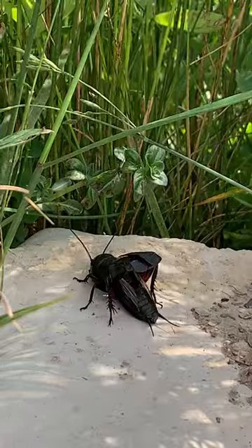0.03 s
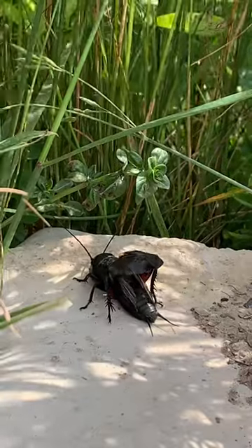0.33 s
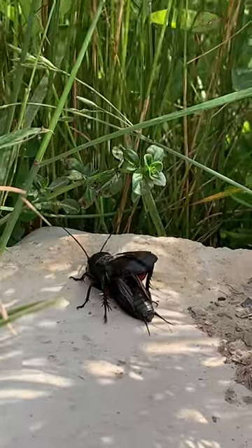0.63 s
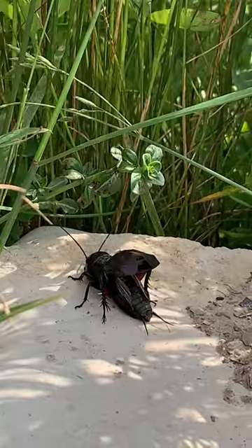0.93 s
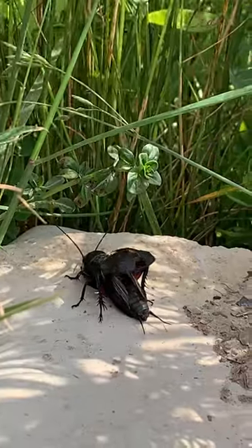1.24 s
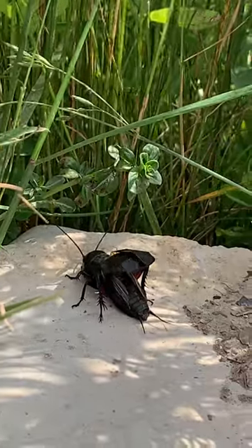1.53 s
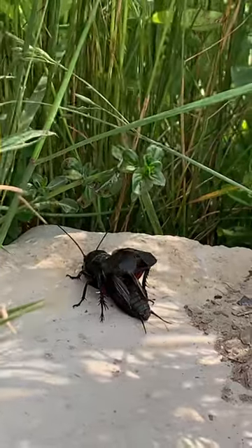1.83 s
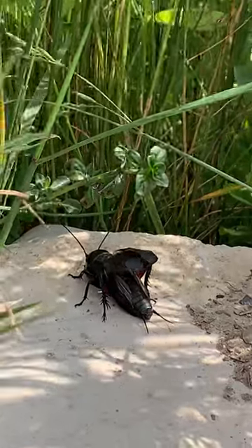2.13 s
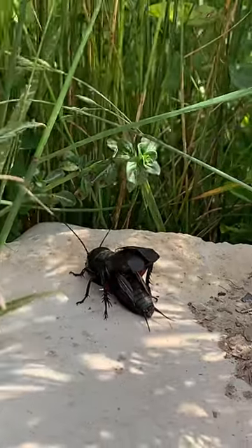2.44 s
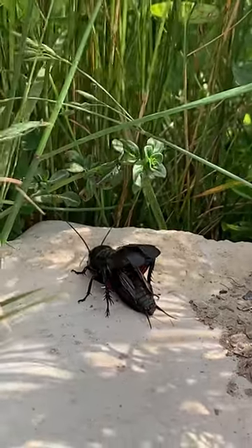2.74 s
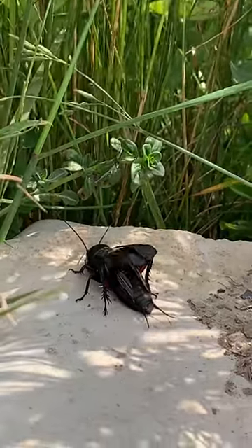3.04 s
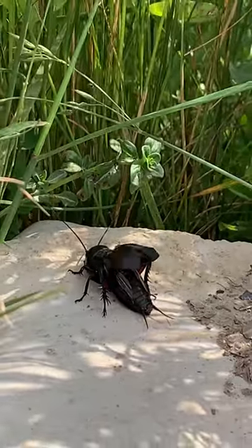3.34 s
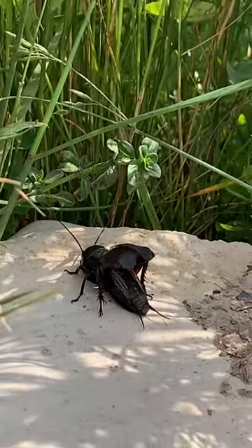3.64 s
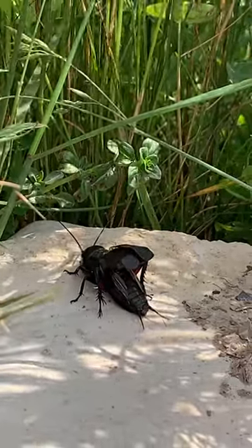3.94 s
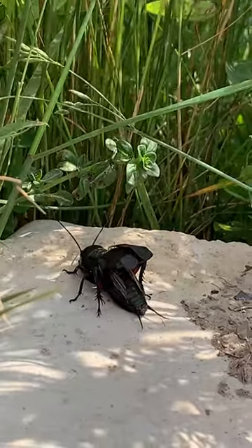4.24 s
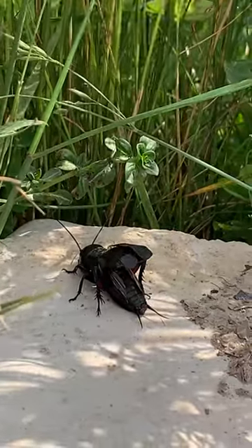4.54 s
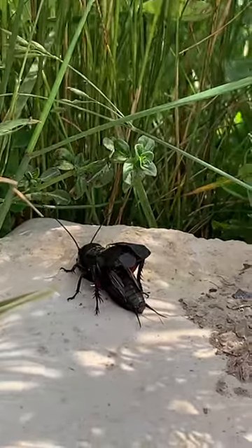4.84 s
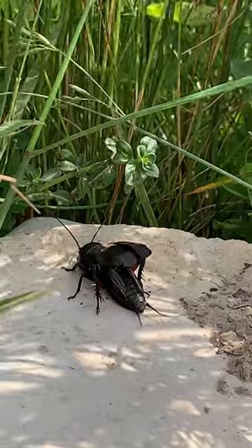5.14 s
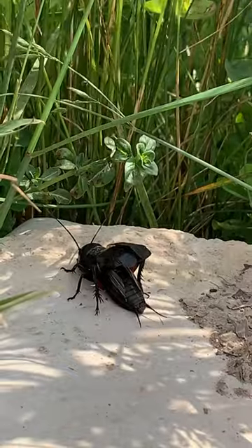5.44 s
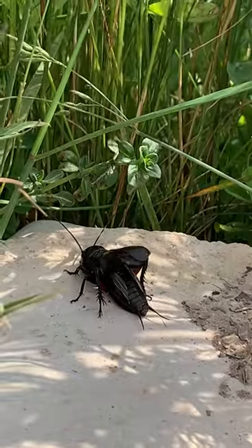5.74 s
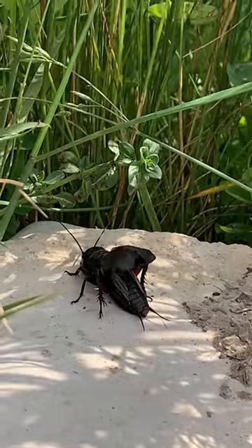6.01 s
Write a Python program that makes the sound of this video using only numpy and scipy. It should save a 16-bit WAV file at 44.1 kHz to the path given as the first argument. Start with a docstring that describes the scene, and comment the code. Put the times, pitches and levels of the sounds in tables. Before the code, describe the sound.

Shrill, ringing chirps from one cricket repeat in short, even bursts right by a stereo microphone, outdoors among grass. Each chirp is a rapid trill on one high pitch with a scratchy edge. The cricket hesitates once late on and then carries on as before. Underneath, a gentle breeze rumbles faintly against the microphone in small irregular puffs, and the surroundings are otherwise very quiet.

```python
"""At the edge of tall grass, a field cricket sings on a stone very close to a small stereo microphone.
It sings by stridulation: in each wing stroke a scraper runs over a file of teeth, drives the wing at
about 4.6 kHz and snags midway, while friction excites the wing's resonances as a rasp. Four or five
strokes make a full chirp. Light wind buffets the microphone, distant insects sizzle faintly, and
something far off drones for a second."""
import sys
import numpy as np
from scipy import signal
from scipy.fft import rfft, irfft, next_fast_len
from scipy.io import wavfile

SR = 44100
rng = np.random.default_rng(int(sys.argv[2]) if len(sys.argv) > 2 else 0)


def dump_mix(stems):
    """Bounce the given channels to the path in sys.argv[1] as a 16-bit WAV at rate SR."""
    frames = np.atleast_2d(stems).T  # one column per channel
    limited = np.clip(frames, -1, 1)  # hard clip at full scale
    pcm = np.round(limited * 32767).astype(np.int16)
    wavfile.write(sys.argv[1], SR, pcm)


N = 272097
TIME = np.arange(N) / SR


def from_db(db):
    """Amplitude ratio of a level in decibels."""
    return 10 ** (np.asarray(db) / 20)


def rms_one(x):
    """Normalisation to unit power."""
    return x / np.sqrt(np.mean(x ** 2) + 1e-20)


def between(low, high, share):
    """Linear interpolation from low to high."""
    return low + (high - low) * share


def along(rows, at):
    """Linear interpolation of each later column of a table against the first."""
    first, *columns = np.transpose(rows)
    return [np.interp(at, first, column) for column in columns]


def around(s, before, after):
    """The samples from `before` seconds ahead of a moment to `after` seconds past it."""
    return slice(max(0, round((s - before) * SR)), round((s + after) * SR))


def burst(t, rise_s, fall_s):
    """Exponential growth and decay, peaking at t = 0."""
    return np.exp(np.minimum(t / rise_s, -t / fall_s))


def wobble(t, step_s):
    """Random modulation: standard normal values, one per step, joined by straight lines."""
    knots = np.arange(t[0], t[-1] + step_s, step_s)
    return np.interp(t, knots, rng.standard_normal(len(t))[:len(knots)])


def band(x, low_hz, high_hz, order=2):
    """Butterworth band-pass filter."""
    sos = signal.butter(order, [low_hz, min(high_hz, .45 * SR)], "band", fs=SR, output="sos")
    return signal.sosfilt(sos, x + 1e-18)


def resonate(x, hz, width_hz):
    """A damped resonator with unit gain at its peak."""
    r = np.exp(-np.pi * width_hz / SR)
    feedback = [1, -2 * r * np.cos(2 * np.pi * hz / SR), r * r]
    return signal.lfilter(np.array([1, 0, -1]) * (1 - r * r) / 2, feedback, x + 1e-18)


def stereo_noise(spectrum, side_db):
    """Partly coherent noise of unit power, coloured by rows of frequency in Hz and relative dB."""
    size = next_fast_len(N)
    points_hz, points_db = np.transpose(spectrum)
    hz = np.maximum(np.fft.rfftfreq(size, 1 / SR), 1)
    colour = from_db(np.interp(np.log(hz), np.log(points_hz), points_db))
    mid, side = irfft(rfft(rng.standard_normal((2, size))) * colour, size)[:, :N]
    return rms_one(mid + from_db(side_db) * side * [[1], [-1]])


# Each row: frequency in Hz, relative spectral density of the background in dB.
AIR_SPECTRUM = [(30, 7), (80, 15.5), (200, 10.5), (350, -2.5), (700, -11.5), (1500, -10.5), (4000, -16.5),
                (9000, -18), (12500, -14.5), (14200, -15), (15300, -22.5), (16500, -32.5)]


def still_air():
    """Stationary broadband noise forms the quiet background."""
    return from_db(-69) * stereo_noise(AIR_SPECTRUM, side_db=4.5)


# Each row: time in seconds, level of the sizzle in dB.
SIZZLE_LEVELS = [(0, -80.5), (1.5, -78.5), (2.6, -80), (4.5, -87.5), (6.17, -83.5)]


def far_insects(flicker_db=3):
    """Small insects deep in the grass merge into narrow-band noise with a flickering amplitude."""
    sizzle_db, = along(SIZZLE_LEVELS, TIME)
    hiss = rms_one(band(rng.standard_normal((2, N)), 13600, 15200, order=3))
    return from_db(sizzle_db + flicker_db * wobble(TIME, .016)) * hiss


# Each row: time in seconds, rumble level in dB, relative flutter level in dB.
BREEZE_LEVELS = [(.03, -64, -64.5), (.42, -58, -58.5), (.78, -56, -59.5), (.88, -56.5, -62.5),
                 (1.05, -56, -56.5), (1.82, -61, -53.5), (2.2, -51.5, -67.5), (2.45, -53, -71.5),
                 (2.64, -63, -66.5), (2.88, -55, -63), (3.25, -57, -69.5), (3.88, -53, -75.5),
                 (4.02, -60.5, -68), (4.45, -53.5, -65), (4.8, -55, -69.5), (4.98, -72.5, -79.5),
                 (5.15, -52.5, -75), (5.68, -61, -65), (6.17, -43.5, -52.5)]
# Each row: peak time in seconds, rumble level in dB, relative flutter level in dB,
# half-length in seconds.
GUST_SWELLS = [(0.513, -37, -48, 0.029), (0.584, -41.5, -57, 0.033), (1.949, -41, -55, 0.062),
               (2.046, -43, -73, 0.025), (2.292, -37.5, -50.5, 0.057), (3.013, -42.5, -51, 0.023),
               (3.369, -41, -77, 0.034), (3.456, -27.5, -58.5, 0.016), (3.665, -38, -42, 0.027),
               (3.758, -47.5, -53, 0.025), (4.356, -42.5, -55, 0.023), (4.446, -45, -51, 0.022),
               (4.589, -35.5, -48, 0.028), (4.645, -41.5, -66, .025), (5.088, -45, -64, .02),
               (5.849, -46, -74, 0.051), (6.109, -44.5, -52, 0.031)]
# Each row of both spectra: frequency in Hz, relative spectral density in dB.
RUMBLE_SPECTRUM = [(15, -30.5), (30, -13), (45, -4), (65, 1), (100, -4.5), (140, -13), (220, -35),
                   (500, -73)]
FLUTTER_SPECTRUM = [(70, -28), (130, 2), (180, 1), (235, -5.5), (280, -22), (320, -19), (400, -18.5),
                    (700, -36), (1500, -51.5), (4000, -71)]


def wind(lump_db=3, lump_s=.046):
    """Turbulent pressure on the microphone: a lumpy breeze and its gusts add in power."""
    rumble_power, flutter_power = from_db(along(BREEZE_LEVELS, TIME) + lump_db * wobble(TIME, lump_s)) ** 2
    for s, rumble_db, flutter_db, half_s in GUST_SWELLS:
        near = around(s, .2, .2)
        swell = np.exp(-((TIME[near] - s) / half_s) ** 2)
        rumble_power[near] += (from_db(rumble_db) * swell) ** 2
        flutter_power[near] += (from_db(flutter_db) * swell) ** 2
    rumble = np.sqrt(rumble_power) * stereo_noise(RUMBLE_SPECTRUM, side_db=-10.5)
    flutter = np.sqrt(flutter_power) * stereo_noise(FLUTTER_SPECTRUM, side_db=4.5)
    return rumble + from_db(-1) * flutter


GENTLE_HZ, FULL_HZ = 4295, 4650.7   # tooth rates at zero and at full effort
# Each row is a chirp: first mid-stroke in seconds, number of strokes, starting period in seconds,
# its growth per stroke in seconds, opening effort from 0 to 1, then tone, snag and catch offsets in dB.
CHIRP_SCORE = [(0.0577, 1, 0.034, 0.0015, 0.99, -1, -2, 5.5),
               (0.2292, 5, 0.035, 0.00094, 0.3, -0.6, -1, -1),
               (0.5458, 5, 0.034, 0.0021, 0.25, 1, -0.9, 0.5), (0.8761, 5, 0.033, 0.0018, 0.3, 0.3, 0, 0.5),
               (1.2053, 5, 0.032, 0.0026, 0.03, -1, 1.7, -1),
               (1.5227, 5, 0.033, 0.0022, 0.2, 0.5, 1.8, -1.6),
               (1.834, 5, 0.031, 0.0036, 0.01, -0.9, 2.4, 1.6),
               (2.2159, 5, 0.034, 0.0015, 0.2, 1, 0.8, 3.3), (2.6206, 5, 0.03, 0.0045, 0, 3.5, -4.5, 3.5),
               (2.957, 5, 0.032, 0.002, 0, -0.0, 0.2, -2.9),
               (3.2856, 5, 0.036, -0.00086, 0, 0.2, -0.56, 4.3),
               (3.6308, 5, 0.032, 0.0026, 0.06, 3.15, -2.5, -5),
               (3.9708, 5, 0.0317, 0.0029, 0.07, 2.4, -1.4, -6),
               (4.3153, 5, 0.031, 0.0024, 0, 2.5, -1, 2.3),
               (4.9378, 4, 0.032, 0.0028, 0.01, 2.8, -1.7, -2.7), (5.2862, 4, 0.033, 0.002, 0, 0.5, 0.4, 2),
               (5.5823, 5, 0.03, 0.0042, 0.06, 0.8, -1.6, -0.1),
               (5.9044, 5, 0.033, 0.0015, 0.05, -1, 0.1, 2.2)]


def strokes(warm_up_strokes=.72, short_opening_s=.003, snag_steepness=2.6):
    """Effort approaches full exponentially within a chirp; pitch, level, grip and snag follow it."""
    rows = []
    for start, count, period, slowing, opening, tone_offset, snag_offset, catch_offset in CHIRP_SCORE:
        for k, (tone_luck, catch_luck, grip_luck) in enumerate(rng.standard_normal((count, 3))):
            s = start + k * period + slowing * k * (k - 1) / 2 - short_opening_s * (k > 0)
            effort = 1 - (1 - opening) * np.exp(-k / warm_up_strokes)
            tooth_hz = between(GENTLE_HZ, FULL_HZ, effort)
            tone_db = between(-22, -8, effort) + tone_offset + .97 * tone_luck
            snag_db = between(-46, -17.5, effort ** snag_steepness) + snag_offset
            # The second stroke tends to catch hardest and hold on longest.
            catch_db = -24 - 1.5 * (k - 1) if k else between(-43.5, -24, effort)
            catch_db += catch_offset + 2.5 * catch_luck
            before = between(.0075, .01, effort)   # seconds of grip on either side of mid-stroke
            after = max(0, .0063 + .002 * (k == 1) - .001 * grip_luck ** 2)
            rows.append((s, before, after, tooth_hz, tone_db, snag_db, catch_db, k == count - 1))
    return rows


def wing_scrape(t, before, after, tone_db, snag_db, catch_db, ends_chirp):
    """The envelopes of a stroke's rough contacts add in power, as incoherent sources do."""
    parting_db, release_db, settle_db = rng.normal(0, 4.5, 3)
    parting = from_db(parting_db - 49.5) * burst(t + .022, .0011, .0025)
    catch = from_db(catch_db - 2) * burst(t + before + .0015, .00063, .0015)
    snag = from_db(snag_db + 1.5) * burst(t + .00047, .00063, .001)
    release = from_db(tone_db + release_db - 20.5) * burst(t - after + .0006, .00046, .00071)
    settle = ends_chirp * from_db(settle_db - 46) * burst(t - .021, .0073, .0043)
    return np.sqrt(parting ** 2 + catch ** 2 + snag ** 2 + release ** 2 + settle ** 2)


def wing_squeak(t, before, catch_db, fall_hz_per_s=300000):
    """Before it locks on, the scraper skids over the teeth too fast: a brief falling glide."""
    since_catch = t + before + .0015
    hz = rng.uniform(6900, 11000) - fall_hz_per_s * since_catch
    envelope = np.exp(-np.minimum((since_catch / .001) ** 2, 50))
    return from_db(catch_db) * envelope * np.sin(2 * np.pi * np.cumsum(hz) / SR)


# Each row: time from mid-stroke in seconds, relative level in dB, tooth rate change at full effort in Hz.
CLOSURE_COURSE = [(-.014, -28.5, -150), (-.009, -13.5, -135), (-.0065, -8, -86.5), (-.004, -3.5, -36.5),
                  (-.0015, 0, 5.5), (.0005, -2, 9.5), (.003, -1.9, -31), (.006, -4, -115),
                  (.010, -11, -260)]
# Each row: frequency in Hz, level in dB at which an overtone radiates, relative to the fundamental.
OVERTONE_RADIATION = [(8500, -7), (9000, -6.5), (9120, -9.5), (9230, -15), (12700, -12), (13300, -21),
                      (13650, -16.5), (13830, -14)]


def wing_tone(t, before, after, tone_db, tooth_hz, jitter_hz=30, snag_jitter_hz=140, mean_braking_hz=330):
    """Forced vibration at the tooth rate: pitch and level follow wing speed while the scraper grips."""
    swing_db, glide_hz = along(CLOSURE_COURSE, t)
    effort = np.clip((tooth_hz - GENTLE_HZ) / (FULL_HZ - GENTLE_HZ), 0, 1)
    unsteady_hz = jitter_hz + effort * snag_jitter_hz * burst(t, .0002, .00018)
    # The wing slows as the scraper lets go.
    braking_hz = 2 * mean_braking_hz * rng.random() * np.exp(np.minimum(t - after - .001, 0) / .0012)
    hz = tooth_hz + effort * glide_hz - braking_hz + unsteady_hz * wobble(t, .00048)
    phase = 2 * np.pi * (np.cumsum(hz) / SR + rng.random())
    grip = np.exp(np.minimum(0, np.minimum((t + before) / .0015, (after - .001 - t) / .0013)))
    uneven_teeth_db = .45 * wobble(t, .001)
    level = grip * from_db(tone_db + swing_db + uneven_teeth_db)
    wing_angle_db = rng.normal(0, 1.2, 2)
    overtones = sum(from_db(along(OVERTONE_RADIATION, k * hz)[0] + db) * np.sin(k * phase)
                    for k, db in zip((2, 3), wing_angle_db))
    return level * np.sin(phase), level * overtones, level


# Each row: resonance frequency in Hz, bandwidth in Hz, relative gain in dB.
WING_RESONANCES = [(3425, 320, -24), (4133, 190, -0.5), (5446, 390, -0.5), (5822, 240, 5.5),
                   (7160, 590, -12.5), (8200, 300, -21.5), (9854, 720, -1), (10916, 330, -8),
                   (10880, 460, -5.5), (12750, 500, -4), (13200, 410, -9), (14500, 830, -11.5)]


def wing_rasp(contact, gain_db=9, grain_db=3.5, wander_db=1.5):
    """Friction noise excites the wing's modes, each more or less as the point of contact wanders."""
    grit = rms_one(rng.standard_normal(N) * from_db(grain_db * wobble(TIME, .0002)))
    rasp = np.zeros(N)
    for k, (hz, width_hz, db) in enumerate(WING_RESONANCES):
        coupling = (-1) ** k * from_db(db + gain_db + wander_db * wobble(TIME, .012))
        rasp += coupling * resonate(grit * contact, hz, width_hz)
    return band(rasp, 2700, 17000, order=5)


def cricket(friction_db=-31):
    """Stridulation: the strokes sum to a tonal song, a rasp and the contact strength that drives it."""
    tone, overtones, level, scrape, squeaks = np.zeros((5, N))
    for s, before, after, tooth_hz, tone_db, snag_db, catch_db, ends_chirp in strokes():
        near = around(s, .03, .04)
        t = TIME[near] - s
        for track, part in zip((tone, overtones, level), wing_tone(t, before, after, tone_db, tooth_hz)):
            track[near] += part
        scrape[near] += wing_scrape(t, before, after, tone_db, snag_db, catch_db, ends_chirp)
        squeaks[near] += wing_squeak(t, before, catch_db)
    contact = scrape + wing_slips() + from_db(friction_db) * level
    membrane_ring = from_db(-18) * resonate(tone, hz=4480, width_hz=45)
    # The song is kept clear of low frequencies.
    song = band(tone + overtones + squeaks + membrane_ring, 3400, 18000, order=4)
    return song, wing_rasp(contact) + wing_judders(), contact


# Each row: frequency in Hz, phase lead of the left channel over the right in radians.
LEFT_PHASE_LEAD = [(0, 1), (2000, 2.6), (2850, 2.2), (3150, 0.9), (3400, 1.1), (3550, 2.3), (4000, 2.23),
                   (4600, 3.022), (5050, 3.96), (5600, 4.38), (6000, 5.72), (6300, 5.1), (7400, 9),
                   (8000, 8.144), (11500, 12.974), (12400, 15), (14000, 16.73), (14800, 18.6)]


def phase_spread(x):
    """The two channels differ in phase by an amount that broadly grows with frequency."""
    size = next_fast_len(N + SR // 10)
    lead, = along(LEFT_PHASE_LEAD, np.fft.rfftfreq(size, 1 / SR))
    return irfft(rfft(x, size) * np.exp(.5j * lead * [[1], [-1]]), size)[:, :N]


def scatter(x, db, t60):
    """Diffuse reflection off stone and stalks: an exponentially dying echo, different at each port."""
    t = TIME[:SR // 3]
    echo = rng.standard_normal((2, len(t))) * np.exp(-np.log(1000) * t / t60)
    return from_db(db) * signal.fftconvolve(x[None], rms_one(echo) / np.sqrt(len(t)), axes=1)[:, :N]


def dull_rub(contact, linger_s=.018, flicker_db=4.5):
    """A faint low hush follows the smoothed power of the friction, so it lingers a moment."""
    r = np.exp(-1 / (linger_s * SR))
    power = signal.lfilter([1 - r], [1, -r], contact ** 2 + 1e-18)
    envelope = from_db(-35 + flicker_db * wobble(TIME, .017)) * np.sqrt(power)
    spectrum = [(200, -13), (500, -5), (1100, -4.5), (2200, -13), (3500, 0), (5000, -13)]
    return envelope * stereo_noise(spectrum, side_db=3)


# Each row: time in seconds, contact strength in dB.
SCRAPER_SLIPS = [(0.32, -31), (.626, -40), (1.54, -30), (1.852, -32), (2.269, -24.5), (3.026, -18.5),
                 (3.337, -24.5), (3.371, -28.5), (5.691, -22.5)]


def wing_slips():
    """Stray contacts of the scraper between closures give short pulses of friction."""
    strength = np.zeros(N)
    for s, db in SCRAPER_SLIPS:
        near = around(s, .01, .02)
        strength[near] += from_db(db) * burst(TIME[near] - s + .00051, rise_s=.00037, fall_s=.0017)
    return strength


# Each row: peak time in seconds, relative level in dB, frequency in Hz, half-length in seconds.
EDDY_PULSES = [(0.521, -33, 115, 0.013), (0.579, -32.5, 52.7, 0.026), (2.274, -33.5, 63.5, 0.013),
               (3.023, -28, 81, 0.013), (3.451, -38, 68, 0.0052), (3.599, -51.5, 261, 0.0054),
               (3.662, -36.5, 228, 0.0076), (3.668, -26.5, 78, 0.0091), (4.257, -46, 170, 0.011),
               (4.454, -31.5, 59.8, .012), (4.578, -38, 215, 0.0105), (4.588, -44, 314, 0.008),
               (5.094, -36.5, 60, .012), (5.236, -36, 60.2, 0.0065), (5.932, -33, 69, 0.012),
               (6.116, -47, 236, 0.0057)]


def eddies(gain_db=-1, hiss_db=-31):
    """Each eddy makes the pressure at the ports oscillate briefly, with a breathy edge."""
    pressure, stir = np.zeros((2, N))
    for s, db, hz, half_s in EDDY_PULSES:
        near = around(s, .1, .1)
        t = TIME[near] - s
        envelope = from_db(db + gain_db) * np.exp(-(t / half_s) ** 2)
        pressure[near] += envelope * np.sin(2 * np.pi * (hz * t + rng.random()))
        stir[near] += envelope
    return pressure + from_db(hiss_db) * stir * band(rng.standard_normal((2, N)), 100, 900, order=1)


# Each row: peak time in seconds, level of the rustle in dB.
BUFFET_PEAKS = [(.59, -63), (2.28, -61.5), (3.019, -57), (3.66, -59.5), (3.725, -62.5)]


def buffets():
    """Strong buffets of wind add a burst of broadband rustle above the thump."""
    strength = sum(from_db(db) * burst(np.clip(TIME - s, -.3, .3), rise_s=.011, fall_s=.022)
                   for s, db in BUFFET_PEAKS)
    spectrum = [(150, -4.5), (300, -1), (600, -6), (1100, -13), (1600, -18.5), (3000, -32), (6000, -52)]
    return strength * stereo_noise(spectrum, side_db=-4)


# Each row: peak time in seconds, relative level of the judder in dB.
JUDDER_PEAKS = [(0.6383, -43.5), (1.015, -42.5), (1.6266, -43.5), (2.6751, -36), (3.7763, -38.5),
                (4.0705, -38.5), (5.392, -34.5), (5.681, -47), (6.0117, -35.5)]


def wing_judders(gain_db=-7):
    """Now and then the whole wing judders, radiating a band of noise below the song's pitch."""
    strength = np.zeros(N)
    for s, db in JUDDER_PEAKS:
        near = around(s, .03, .03)
        strength[near] += from_db(db + gain_db) * burst(TIME[near] - s, rise_s=.0012, fall_s=.0044)
    return strength * rms_one(band(rng.standard_normal(N), 2850, 3700, order=3))


# Each row: time in seconds, level of the drone in dB.
DRONE_LEVELS = [(0, -91.5), (.8, -79.5), (1.05, -75.5), (1.3, -80), (1.55, -66), (1.8, -68), (2.0, -79.5),
                (2.5, -100), (6.17, -105)]
# Each row: frequency in Hz, relative spectral density in dB.
DRONE_SPECTRUM = [(100, -30.5), (250, -11.5), (380, -16.5), (490, 1.5), (580, -3.5), (750, -27.5),
                  (1500, -43.5)]


def far_drone():
    """Noise with a spectral peak near 500 Hz swells and fades as a distant drone."""
    drone_db, = along(DRONE_LEVELS, TIME)
    return from_db(drone_db) * stereo_noise(DRONE_SPECTRUM, side_db=-1)


def scene(song_db=-1.95):
    """Superposition of the cricket's direct sound, its reflections, the wind and the background."""
    song, rasp, contact = cricket()
    song = from_db(song_db) * song
    stone = scatter(song, db=-31, t60=.047) + scatter(rasp, db=-17, t60=.008)
    grass = scatter(song, db=-59.5, t60=.16) + scatter(rasp, db=-30, t60=.16)
    breeze = wind() + eddies() + buffets()
    background = still_air() + far_drone() + far_insects()
    return phase_spread(song + rasp) + stone + grass + dull_rub(contact) + breeze + background


def record(dry, cutoff_hz=16300):
    """An elliptic low-pass filter cuts the highest treble steeply."""
    return signal.sosfilt(signal.ellip(10, .1, 80, cutoff_hz, fs=SR, output="sos"), dry)


dry = scene()
out = record(dry)
dump_mix(out)
```